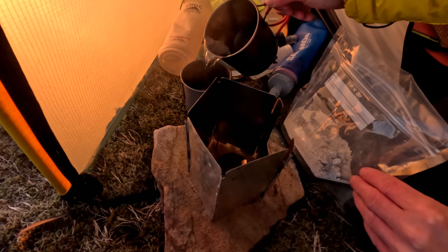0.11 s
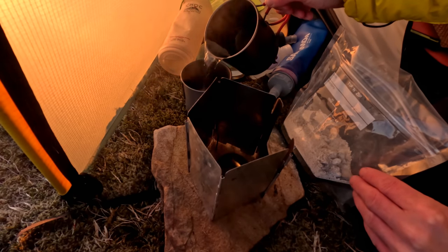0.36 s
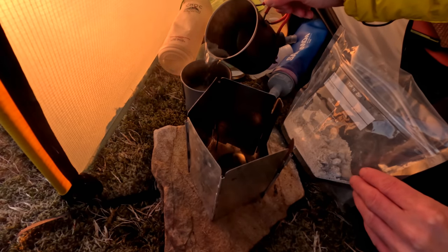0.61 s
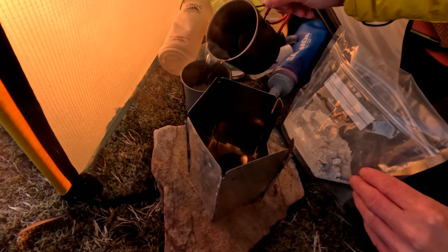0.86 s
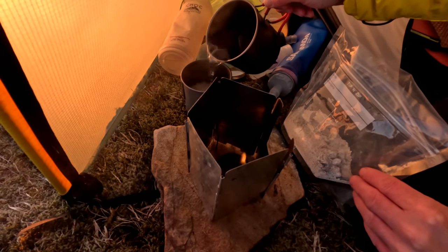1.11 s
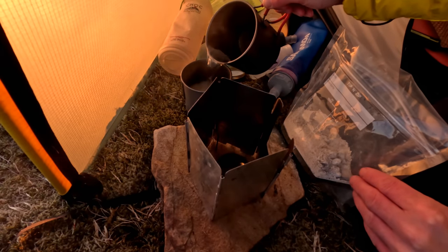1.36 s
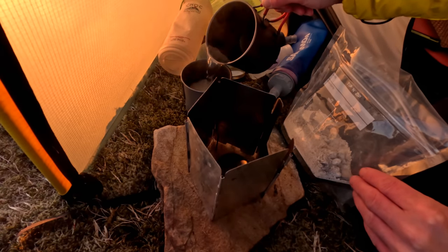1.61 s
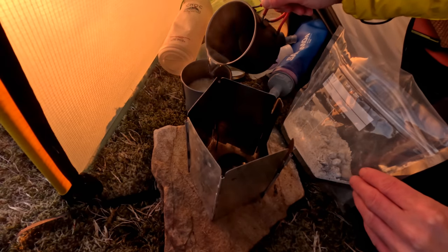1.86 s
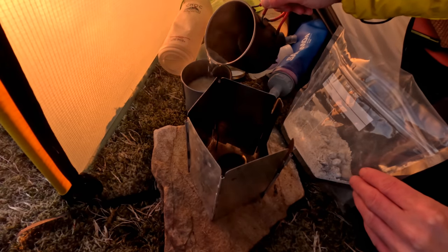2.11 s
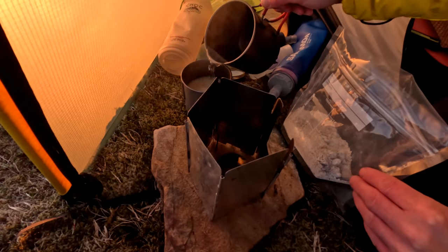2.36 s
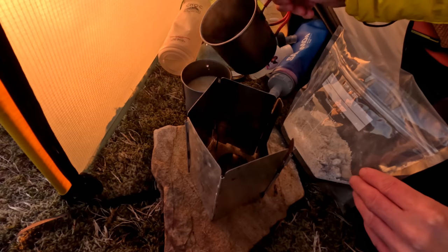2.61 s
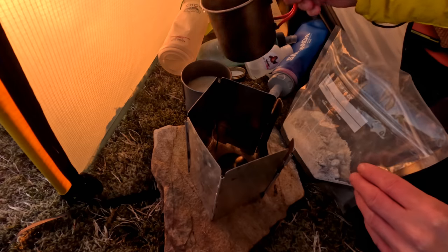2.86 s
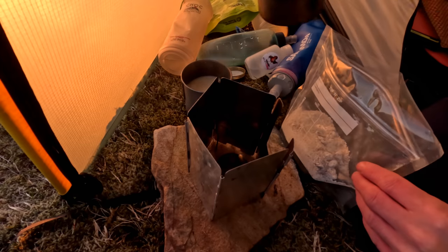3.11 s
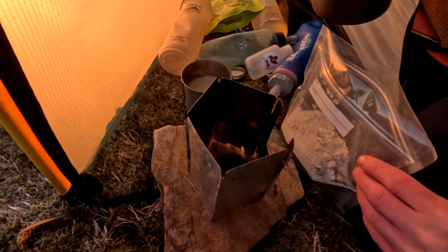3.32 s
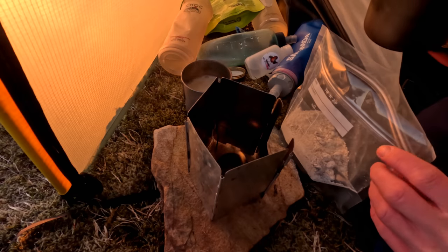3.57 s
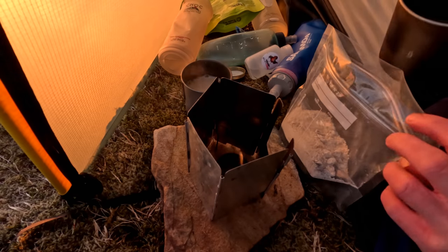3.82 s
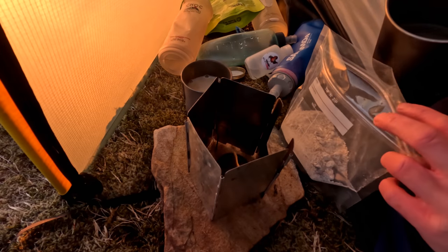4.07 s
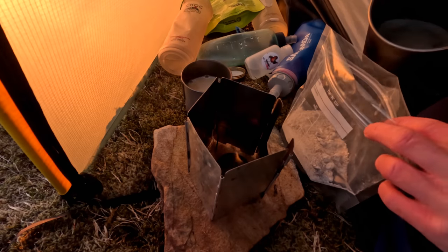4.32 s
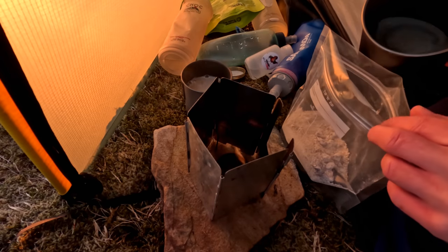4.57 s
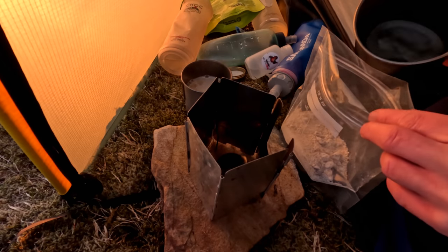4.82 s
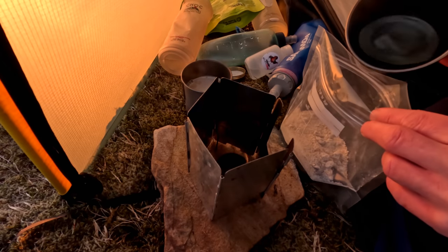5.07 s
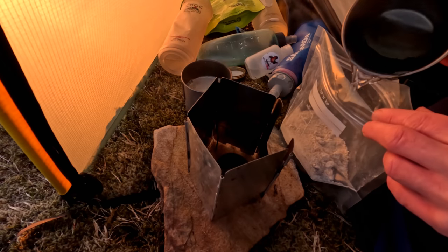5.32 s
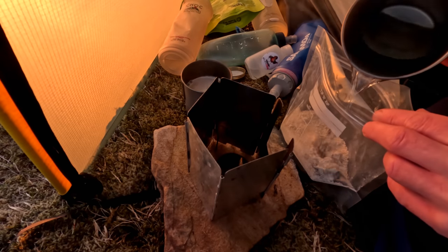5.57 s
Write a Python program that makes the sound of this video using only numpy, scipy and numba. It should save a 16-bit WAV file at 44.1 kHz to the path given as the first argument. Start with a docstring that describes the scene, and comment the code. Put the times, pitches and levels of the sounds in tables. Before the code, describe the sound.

In a small tent, heard very close and dry with almost no difference between left and right. From the start, water pours from a metal pot into a mug: irregular splashes, bright metallic spatter and small ringing bubbles over a hollow tone that slowly rises as the mug fills. After about 1.5 s the stream thins; near 1.75 s comes one crisp snap with a soft bump, then weak gurgles and drips, with a final small splash around 2.6-2.7 s. From 2.8 s a stiff plastic bag is handled, with light crackles, airy rustle and low hand drags. A sharp snap lands at 3.4 s, a thin sliding hiss at 3.75-4.05 s, and dense loud crackling runs from 3.8 to about 5.1 s, strongest near 4.6 s, with dull bumps. After a brief lull, a few snaps follow at 5.45-5.7 s. Faint steady outdoor air lies underneath.

```python
"""Tent, hot water and a food bag

Inside a small tent, hot water runs from a metal pot into a mug: splashes, drops and bubbles drive
resonators whose lowest pitch rises as the mug fills. Then fingers open a stiff plastic food bag:
noise bursts ring the film as snaps, over a rustle of tiny grains, gliding hiss, low bumps and drags.
Quiet outdoor air comes through the canvas. A small stereo microphone hears it all close and dry,
almost the same on both sides; levels in the tables are those ahead of the microphone."""
import sys
import numpy as np
from scipy import signal
from scipy.fft import rfft, irfft
from scipy.io import wavfile
from scipy.ndimage import uniform_filter1d
from numba import njit

SR = 44100
rng = np.random.default_rng(int(sys.argv[2]) if len(sys.argv) > 2 else 0)


def int16_out(signal):
    """Quantize to a 16-bit WAV file."""
    q = np.round(np.clip(np.atleast_2d(signal).T, -1, 1) * 32767)
    wavfile.write(sys.argv[1], SR, q.astype(np.int16))


def undo_db(level):
    """Turn decibels back into plain size, where 20 dB means ten times bigger."""
    steps = np.asarray(level, float) / 20
    return 10 ** steps


N = 250929


def gain_at(points, hz):
    """Gain of (frequency [Hz], level [dB]) points joined on a log frequency axis."""
    at, db = np.transpose(points)
    return undo_db(np.interp(np.log(np.maximum(hz, 1)), np.log(at), db))


def colour(x, points):
    """Minimum-phase filter: folding the cepstrum of the log gain makes it causal."""
    cepstrum = irfft(np.log(gain_at(points, np.fft.rfftfreq(2048, 1 / SR))))
    cepstrum[1:1024] *= 2
    cepstrum[1025:] = 0
    response = irfft(np.exp(rfft(cepstrum)))[:1024]
    return signal.fftconvolve(x, response)[:N]


def unit(x):
    """Scale to rms 1."""
    return x / np.sqrt(np.mean(x ** 2))


def curves(table):
    """Columns of a table, after its times, at every sample."""
    s, *columns = np.transpose(table)
    return [np.interp(np.arange(N) / SR, s, c) for c in columns]


@njit
def svf(x, hz, width):
    """State-variable band-pass with a moving centre and gain 1 there; hz per sample, width in Hz."""
    y, band, low = np.empty(len(x)), 0., 0.
    for i in range(len(x)):
        g, k = np.tan(np.pi * hz[i] / SR), width / hz[i]
        v = (band + g * (x[i] - low)) / (1 + g * (g + k))
        band, low, y[i] = 2 * v - band, low + 2 * g * v, k * v
    return y


def modes(x, table, stretch=1.):
    """Sum of resonances, all moved by stretch, signs alternating so the valleys stay shallow."""
    total = 0
    for k, (hz, width, db) in enumerate(table):
        centre = np.full(len(x), 1. * hz) * stretch
        total = total + (-1) ** k * undo_db(db) * svf(x, centre, 1. * width)
    return total


def walk(rate):
    """Random levels held 1 / rate s and slewed twice; spread near 1."""
    k = int(SR / rate)
    held = np.repeat(rng.standard_normal(N // 100), k)[:N]
    return 1.82 * uniform_filter1d(uniform_filter1d(held, k), k)


def walk_gain():
    """A slight quick flicker of level."""
    return undo_db(1.5 * walk(16))


def grains(per_s, spread_db, smear_ms):
    """Scattered tiny impacts, a few much larger, each a short burst of noise; rms 1."""
    when, size, fill = rng.random(N), rng.exponential(size=N), rng.standard_normal(N)
    struck = np.clip((per_s / SR - when) * 82000.0, 0, 1)
    hits = struck * undo_db(2 * spread_db * np.minimum(size, 3.5))  # as power
    keep = np.exp(-2000 / (smear_ms * SR))
    return unit(np.sqrt(signal.lfilter([1], [1, -keep], hits)) * fill)


def add(out, s, piece):
    """Mix a short sound in at time s."""
    i = int(s * SR)
    out[i:i + len(piece)] += piece[:N - i]


def burst(noise, length_ms):
    """Noise that starts within a fraction of its length and dies away."""
    u = np.arange(len(noise)) / SR * 1000 / max(length_ms, .2)
    return noise * (1 - np.exp(-u / 0.06)) * np.exp(-u)


def gate(start_s, length_s, rise_s, fall_s):
    """Gain 1 while held, exponential before and after."""
    t = np.arange(N) / SR
    rise, fall = (t - start_s) / rise_s, (start_s + length_s - t) / fall_s
    return np.exp(np.minimum(0, np.minimum(rise, fall)))


# ring length; pitch rise over it and scatter between bubbles, as shares
BUBBLE_CYCLES, BUBBLE_GLIDE, BUBBLE_SPREAD = 7., .15, .07


def bubbles(hz, count):
    """Trapped air rings for a few cycles, rising in pitch; a few bubbles are much louder; rms 1."""
    out = np.zeros(N)
    times = rng.random(count) * STREAM[-1][0]
    for when, size, tune in zip(times, rng.exponential(size=count), rng.standard_normal(count)):
        turns = np.arange(1024) / SR * hz[int(when * SR)] * np.exp(BUBBLE_SPREAD * tune)
        u = turns / BUBBLE_CYCLES
        swell = 3 * u * np.exp(-3 * u)
        ring = np.sin(2 * np.pi * turns * (1 + BUBBLE_GLIDE * u / 2))
        add(out, when, undo_db(2.1 * min(size, 3)) * swell * ring)
    return unit(out)


# the air column shortens as the mug fills, ever more slowly: start, limit it nears, time constant
COLUMN_START_HZ, COLUMN_LIMIT_HZ, FILL_S = 900., 1482, 2.68
MUG_WIDTH_HZ, GURGLE_HZ, SMALL_BUBBLE_HZ = 190., 847, 3155
# upper modes, shares of pitch: rise early in the filling, wander with the churn, splash to splash
UPPER_RISE, UPPER_WANDER, SPLASH_SPREAD = .07, .025, .03
# stream into the mug, thinning out as the pot empties: (time [s], level [dB],
# upper modes rung by spray [dB against the lowest mode], gurgle [dB against the lowest mode])
STREAM = [(0, -53.5, -7, -10), (.1, -47, -3.5, -20), (.22, -56.5, 2.5, -25), (.3, -50, -5, -14),
          (.5, -50.5, 1.5, -12), (.62, -46.5, -4.5, -8.5), (.8, -48.5, 1, -7.5), (.97, -48.5, 3.5, -11),
          (1.1, -50.5, 2.5, -12), (1.3, -53, 4.5, -8), (1.55, -52, 1, -6), (1.68, -57.5, 3.5, 0.5),
          (1.95, -62, -1, 8), (2.1, -60.5, 1.5, -15), (2.3, -57.5, -6, 4), (2.36, -75, -7, -12),
          (2.56, -64, -4, 6), (2.65, -60.5, 1, 3.5), (2.721, -57.5, 1, 4)]
# loudest splashes and last drips: (time [s], peak level [dB], upper modes [dB against the lowest])
SPLASH_HITS = [(0.083, -35, -1), (0.133, -26.5, -23), (0.112, -33, 11), (0.17, -31, 0.5), (0.186, -35, -12),
               (0.214, -40, -15), (0.277, -31, -21), (0.389, -31, 8), (0.421, -29.5, -4), (0.442, -30, 20),
               (0.543, -28.5, 7), (0.583, -36, -14), (0.597, -29, 8), (0.614, -25.5, 10), (0.635, -29, 4),
               (0.65, -28, 12), (0.66, -29.5, 11), (0.693, -36, 8), (0.714, -45, 7), (0.727, -39, -5),
               (0.783, -28, 7), (0.82, -31.5, -4), (0.887, -28, 11), (0.896, -32, 0), (0.929, -30.5, -9),
               (0.958, -23, 29), (0.976, -30, 13), (0.999, -25.5, 29), (1.011, -35, 2), (1.04, -35.5, -13),
               (1.063, -38, 0), (1.112, -39, 17), (1.152, -29, 5), (1.163, -27.5, 13), (1.22, -28, 22),
               (1.239, -29, 17), (1.26, -26, -0.5), (1.328, -23.5, 17), (1.389, -32.5, 28),
               (1.41, -29.5, 6), (1.436, -33, 8), (1.497, -35, -6), (1.514, -28, 2), (1.677, -28.5, 17),
               (1.704, -32, 0), (1.963, -40, -12), (2.013, -40, -17), (2.058, -38, -4), (2.067, -36.5, -2),
               (2.092, -41, 14), (2.106, -36, 6), (2.117, -35, 15), (2.147, -37, 4), (2.259, -35, -2),
               (2.287, -41, 10), (2.308, -42.5, -12), (2.602, -35, -4), (2.621, -32.5, -1),
               (2.659, -29.5, -1), (2.68, -26, -10)]
# upper resonances of the mug, ahead of their shifts: (frequency [Hz], width [Hz], level [dB])
MUG_UPPER_MODES = [(2850, 186, 8), (3480, 286, 5.5), (4850, 660, -6), (6900, 280, -6.5), (11100, 500, -16)]


def pour():
    """Splashes kick the air column of the mug; the churning surface keeps shifting its pitch."""
    t = np.arange(N) / SR
    db, upper_db, gurgle_db = curves(STREAM)
    hz = COLUMN_LIMIT_HZ + (COLUMN_START_HZ - COLUMN_LIMIT_HZ) * np.exp(-t / FILL_S)
    lift = 1 - UPPER_RISE * np.exp(-t / 0.43)
    surge = walk(24.14)
    churn = np.exp(.03 * walk(120))
    drops = grains(230, 3.4, .5)
    # separate drops strike all modes at once; the finer spray feeds each on its own
    fine = grains(500, 2.6, 1.5)
    low = unit(svf(svf(drops + .45 * fine, hz * churn, MUG_WIDTH_HZ), hz, 480.))
    low = .75 * low + .55 * bubbles(hz, count=500)
    # bigger bubbles gurgle under the air column
    gurgle = unit(svf(grains(200, 2.4, 6.), GURGLE_HZ * np.exp(.09 * walk(40)), 260.))
    spray = drops + .6 * grains(450, 3.6, .5)
    upper = unit(modes(spray, MUG_UPPER_MODES, lift * np.exp(UPPER_WANDER * walk(17))))
    upper = .8 * upper + .4 * bubbles(SMALL_BUBBLE_HZ * lift, count=700)
    upper = upper * undo_db(upper_db + 2.1 * walk(40.14))
    running = t < STREAM[-1][0]
    out = running * undo_db(db + 1.2 * surge) * (low + undo_db(gurgle_db) * gurgle + upper)
    noises = rng.standard_normal((len(SPLASH_HITS), 1024))
    for (s, peak_db, top_db), noise in zip(SPLASH_HITS, noises):
        i = int(s * SR)
        pitch = np.full(len(noise), hz[i])
        column = svf(svf(burst(noise, 0.6), pitch, MUG_WIDTH_HZ), pitch, 450.0)
        deep = svf(burst(noise, 2.8), np.full(len(noise), GURGLE_HZ), 153.0)
        column = column + undo_db(-15) * deep
        top = modes(burst(noise, 1.1), MUG_UPPER_MODES, lift[i] * np.exp(SPLASH_SPREAD * noise[-1]))
        top = svf(top, np.full(len(noise), 3700.), 1700.0)
        ring = column / np.abs(column).max() + undo_db(top_db) * top / np.abs(top).max()
        add(out, s, undo_db(peak_db) * ring / np.abs(ring).max())
    return out


AIR_DB = -59  # rms, ahead of the flicker
# spectrum shape of the air outside: (frequency [Hz], level per Hz [dB])
AIR_SHAPE = [(30, -4), (70, -17), (100, -20.5), (190, -4), (400, -23.5), (650, -6.5), (1500, -13),
             (3000, -19.5), (6000, -21), (12000, -25.5)]


def air():
    """Quiet outdoor air through the canvas: coloured noise with a slight flicker."""
    return undo_db(AIR_DB) * walk_gain() * unit(colour(rng.standard_normal(N), AIR_SHAPE))


REACH_S, LET_GO_S = 0.015, 0.018  # a movement fades in and out with these time constants
REST_DB, REST_TREBLE_DB, REST_DRAG_DB = -66.5, 5, -57  # fabric stirring all the time
# hand movements on film and fabric: (start [s], length [s], rustle level [dB],
# treble [dB against the rustle], low drag level [dB])
HAND_MOVES = [(1.728, 0.036, -47, -14, -70), (2.895, 0.081, -52.5, 6, -44.5), (3, 0.084, -51, 3.5, -53),
              (3.11, 0.051, -52.5, 4, -59), (3.17, 0.24, -52.5, 7, -52), (3.406, 0.063, -51.5, 6.5, -45),
              (3.488, 0.19, -56, 8, -52.5), (3.674, 0.092, -53, 6, -47), (3.781, 0.22, -48.5, 5.5, -46),
              (3.977, 0.2, -55.5, 6.5, -52.5), (4.227, 0.057, -31, 3, -55), (4.326, 0.061, -45.5, 0, -62),
              (4.434, 0.21, -49, 2.5, -76), (4.59, 0.36, -49, -4, -49.5), (4.966, 0.071, -57, 11, -59),
              (5.064, 0.033, -53.5, 13, -47.5), (5.127, 0.033, -52, 2.5, -72),
              (5.283, 0.011, -49, -15, -74), (5.489, 0.0061, -42.5, -3, -46),
              (5.536, 0.14, -50.5, 7, -53.5)]
# spectrum shape of film and fabric: (frequency [Hz], level per Hz [dB])
RUSTLE_SHAPE = [(200, -8.5), (600, -1), (1700, -3), (3500, -3.5), (5600, -6), (8000, -9), (12000, -11.5)]
# spectrum shape of the dragging hand: (frequency [Hz], level per Hz [dB])
DRAG_SHAPE = [(40, -21), (100, -20.5), (190, -9.5), (300, -7.5), (500, -10), (900, -16.5)]


def hands():
    """Film and fabric hiss and crackle, low and high folds each on their own; the hand drags low."""
    low, high = undo_db(REST_DB) ** 2, undo_db(REST_DB + REST_TREBLE_DB) ** 2
    dragging = undo_db(REST_DRAG_DB) ** 2
    for start_s, length_s, db, treble_db, drag_db in HAND_MOVES:  # powers add up
        power = gate(start_s, length_s, REACH_S, LET_GO_S) ** 2
        low = low + power * undo_db(db) ** 2
        high = high + power * undo_db(db + treble_db) ** 2
        dragging = dragging + power * undo_db(drag_db) ** 2
    split = signal.butter(2, 2500, fs=SR, output="sos")
    big, small = (unit(colour(grains(300, 4.5, 0.5) + 1.8 * rng.standard_normal(N), RUSTLE_SHAPE))
                  for _ in range(2))
    low_folds = np.sqrt(low) * signal.sosfilt(split, big) * walk_gain()
    high_folds = np.sqrt(high) * (small - signal.sosfilt(split, small)) * walk_gain()
    drag = np.sqrt(dragging) * unit(colour(grains(250, 2., 5.0), DRAG_SHAPE))
    return low_folds + high_folds + drag


# soft bumps of hand and pot: (time [s], peak level [dB], frequency [Hz])
SOFT_BUMPS = [(0.524, -51.5, 229), (1.717, -38, 513), (1.775, -33, 284), (2.182, -46.5, 183),
              (2.244, -44.5, 224), (2.539, -44.5, 190), (2.677, -40, 203), (3.335, -38, 200),
              (3.848, -28.5, 343), (3.954, -26.5, 270), (4.148, -38, 304), (4.269, -34.5, 338),
              (4.659, -36, 247), (4.749, -35, 228), (5.082, -26.5, 630), (5.118, -42, 146),
              (5.53, -42, 178), (5.562, -51, 105)]


def bumps():
    """A soft push of some milliseconds rings low and briefly."""
    out = np.zeros(N)
    noises = rng.standard_normal((len(SOFT_BUMPS), 4096))
    for (s, peak_db, hz), noise in zip(SOFT_BUMPS, noises):
        centre = np.full(len(noise), 1. * hz)
        push = burst(.15 + noise, 10.)  # a steady push with grit
        thud = svf(svf(push, centre, 0.52 * hz), centre, 43.0 * hz)
        add(out, s, undo_db(peak_db) * thud / np.abs(thud).max())
    return out


# decay time of a snap peaking at -16.5 dB; its random spread; weaker snaps are shorter, share per dB
SNAP_MS, SNAP_SPREAD, SNAP_SHRINK = 1.93, .18, 0.019
EDGE_DB, EDGE_DB_PER_OCTAVE = -25.5, 17.5  # top edge against a crack at 2 kHz; brighter ones have more
PANEL_SPREAD = .16  # each crease rings a panel of another size
JOLT_DB, JOLT_HZ = -26, 70.  # deep jolt under the knock
# sharp snaps, mostly creases in the film: (time [s], peak level of the crack [dB],
# brightest frequency [Hz], low knock [dB against the peak])
CREASE_SNAPS = [(1.416, -52, 11000, -30), (1.433, -48, 11000, -30), (1.773, -17, 1730, -13),
                (1.889, -35.5, 900, 11), (2.819, -28.5, 4600, -16), (2.843, -28.5, 3520, -21),
                (2.862, -22, 6340, -22.5), (3.107, -27, 1710, -30), (3.12, -36, 5500, -30),
                (3.131, -26, 2240, -21), (3.146, -28.5, 5000, -25), (3.26, -35, 3600, -30),
                (3.395, -10, 2380, -18.5), (3.438, -29, 2590, -17), (3.466, -39, 2700, -20),
                (3.784, -18, 3460, -33), (3.79, -11, 3870, -16.5), (3.825, -19.5, 1770, -13),
                (3.833, -19, 1790, -8), (3.852, -18, 1620, -7), (3.858, -6.5, 1500, -14),
                (3.895, -14.5, 1540, -19.5), (3.957, -13.5, 2300, -13.5), (4.042, -29, 2560, -32),
                (4.09, -25, 1260, -10), (4.101, -8.5, 2220, -10.5), (4.105, -7, 1770, -18),
                (4.122, -30, 1740, 6), (4.136, -7, 3200, -18), (4.209, -15, 3160, -23),
                (4.224, -19, 1470, -21), (4.237, -17, 1790, -13), (4.249, -15, 3500, -25),
                (4.267, -14, 4800, -12.5), (4.289, -20, 1890, -13), (4.332, -19, 4380, -14.5),
                (4.347, -17, 4660, -21), (4.446, -17.5, 2940, -24), (4.464, -15.5, 2500, -8.5),
                (4.526, -10.5, 3300, -20.5), (4.585, -4.5, 2850, -15), (4.599, -13.5, 2600, -8),
                (4.634, -3, 3370, -21), (4.661, -36.5, 902, 13), (4.674, -14.5, 4050, -10),
                (4.707, -24, 1060, -5.5), (4.732, -20.5, 2010, -5), (4.746, -34, 1500, 1),
                (4.756, -24.5, 2600, -9), (4.803, -10, 1780, -13.5), (4.849, -22.5, 1560, -12),
                (4.867, -11.5, 1430, -19), (4.881, -40, 900, 6), (4.935, -15, 1820, -14),
                (4.941, -23.5, 1950, -1.5), (4.98, -13.5, 2210, -15.5), (5.056, -27, 2580, -6),
                (5.066, -26, 3030, -26), (5.116, -19.5, 1400, -39), (5.451, -22.5, 2380, -41),
                (5.46, -23.5, 1700, -35), (5.478, -12.5, 2740, -24), (5.581, -25.5, 1600, -36),
                (5.621, -23.5, 3400, -15), (5.641, -25.5, 2400, -16), (5.652, -31.5, 1130, -4.5),
                (5.675, -30, 3000, -25)]
# resonances of the bag, ahead of the panel spread: (frequency [Hz], width [Hz], level [dB])
BAG_MODES = [(1500, 376, 0.5), (3004, 500, 5), (3820, 2250, -2.5), (6270, 2150, 0)]


def snaps():
    """A crease lets go in a burst that rings the film; the panel's low knock follows and lasts longer."""
    out = np.zeros(N)
    noises = rng.standard_normal((len(CREASE_SNAPS), 2, 2048))
    for (s, peak_db, hz, knock_db), noise in zip(CREASE_SNAPS, noises):
        ms = SNAP_MS * np.exp(SNAP_SPREAD * noise[1, -1] + SNAP_SHRINK * (peak_db + 16.5))
        edge_db = EDGE_DB + EDGE_DB_PER_OCTAVE * np.log2(hz / 2000)
        slips = np.sign(noise[0])  # equal tiny slips, either way
        kick = burst(slips, ms) + undo_db(-15.0) * burst(slips, 1.32 * ms)
        size = len(kick)
        film = modes(kick, BAG_MODES, np.exp(PANEL_SPREAD * noise[0, -1])) + .2 * kick
        crack = svf(film, np.full(size, 1. * hz), .95 * hz)
        crack = svf(crack, np.full(size, 2500.), 9000.0)
        edge = svf(burst(noise[0], 1.5 * ms), np.full(size, 8500.), 8500.0)
        snap = crack / np.abs(crack).max() + undo_db(edge_db) * edge / np.abs(edge).max()
        add(out, s, undo_db(peak_db) * snap)
        knock = svf(burst(0.05 + noise[1], 1.57 * ms), np.geomspace(750., 250., size), 346.0)
        jolt = svf(burst(np.ones(size), 2.8), np.full(size, JOLT_HZ), 110.0)
        low = knock / np.abs(knock).max() + undo_db(JOLT_DB) * jolt / np.abs(jolt).max()
        add(out, s + 0.00155, undo_db(peak_db + knock_db) * low)
    return out


HISS_RISE_S, HISS_FADE_S, HISS_WIDTH_HZ = 0.041, 0.053, 400.
# narrow hiss, as of film sliding on film: (start [s], length [s], level [dB],
# start frequency [Hz], end frequency [Hz])
FILM_HISSES = [(2.912, 0.04, -50, 2200, 2920), (3.745, 0.31, -47, 4300, 4460),
               (4.858, 0.066, -50.5, 3900, 3950)]


def hiss():
    """A narrow band of noise whose centre glides and drifts a little."""
    start_s, length_s, _, start_hz, end_hz = np.transpose(FILM_HISSES)
    times = np.ravel([start_s, start_s + length_s], "F")
    glide = np.interp(np.arange(N) / SR, times, np.ravel([start_hz, end_hz], "F"))
    centre = glide * (1 + .012 * walk(30))
    level = sum(undo_db(db) * gate(s, length, HISS_RISE_S, HISS_FADE_S)
                for s, length, db, _, _ in FILM_HISSES)
    band = svf(svf(rng.standard_normal(N), centre, HISS_WIDTH_HZ), centre, 2 * HISS_WIDTH_HZ)
    return level * unit(band)


def scene():
    """Everything is near and heard from one place."""
    mix = pour() + air() + hands() + bumps() + snaps() + hiss()
    return np.tile(mix, (2, 1))


def band_limit(x):
    """A steep low-pass at the top of the band."""
    return signal.sosfilt(signal.butter(12, 14260, fs=SR, output="sos"), x)


# response of the microphone: (frequency [Hz], gain [dB])
MICROPHONE_RESPONSE = [(20, -20), (110, -7), (160, 3.5), (5000, -5), (7500, -10.5), (8700, -22),
                       (9050, -29), (9400, -19), (11500, -14.5), (13000, -29.5), (14000, -32), (14500, -39)]
# how unlike the two capsules hear: (frequency [Hz], side against mid [dB])
CAPSULE_DIFFERENCE = [(30, -38), (150, -44), (2000, -43.5), (5000, -34), (8000, -23), (11000, -14),
                      (14000, -2)]


def record(dry):
    """The capsules cut the bass, have a treble notch and hear the highest treble each in its own way."""
    mid = colour(dry[0], MICROPHONE_RESPONSE)
    side = colour(mid * walk(400), CAPSULE_DIFFERENCE)
    return band_limit(np.array([mid + side, mid - side]))


dry = scene()
out = record(dry)
int16_out(out)
```